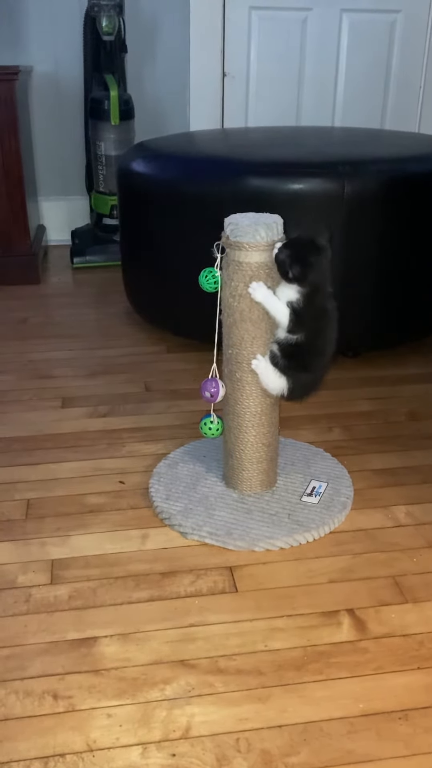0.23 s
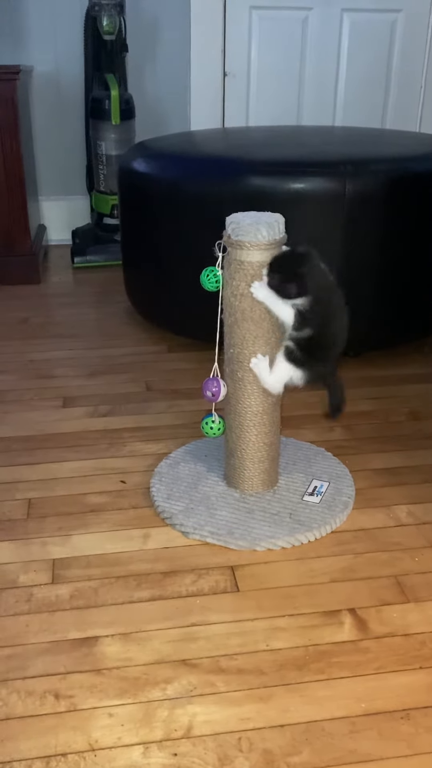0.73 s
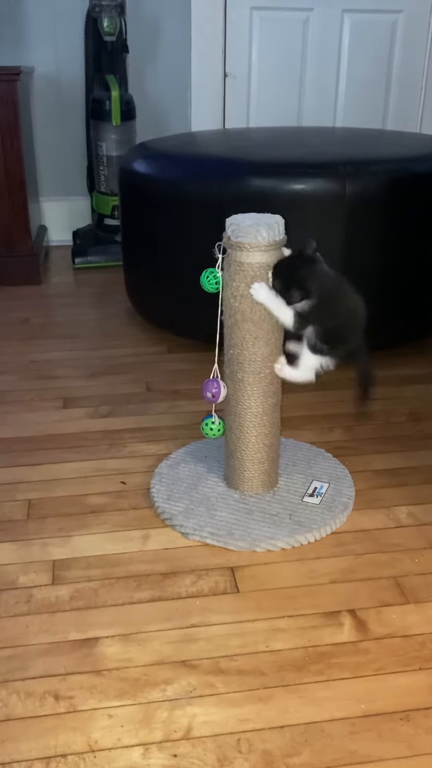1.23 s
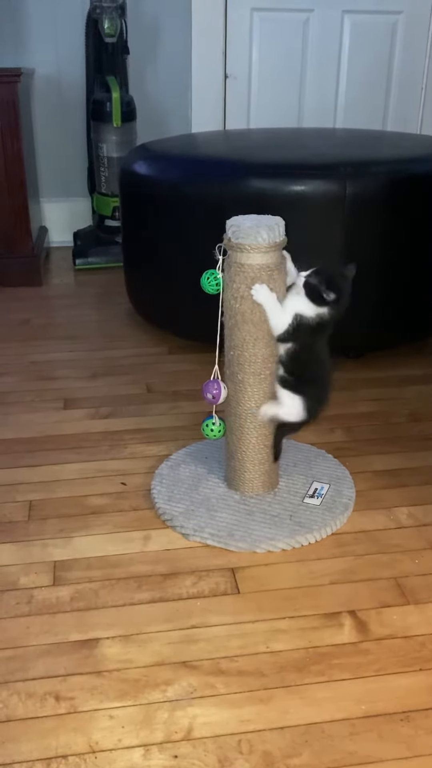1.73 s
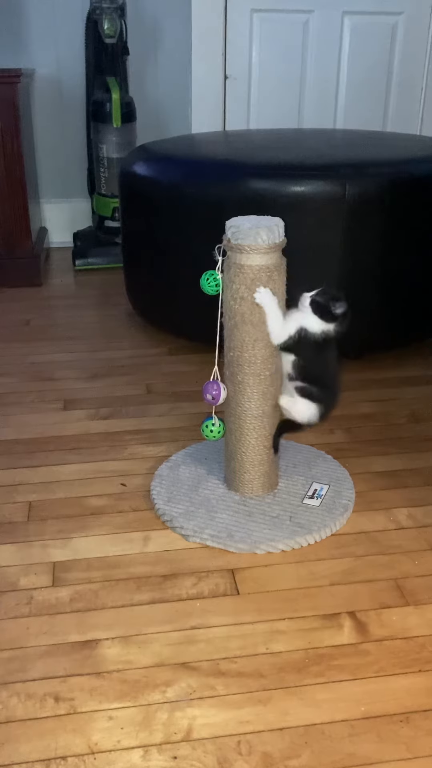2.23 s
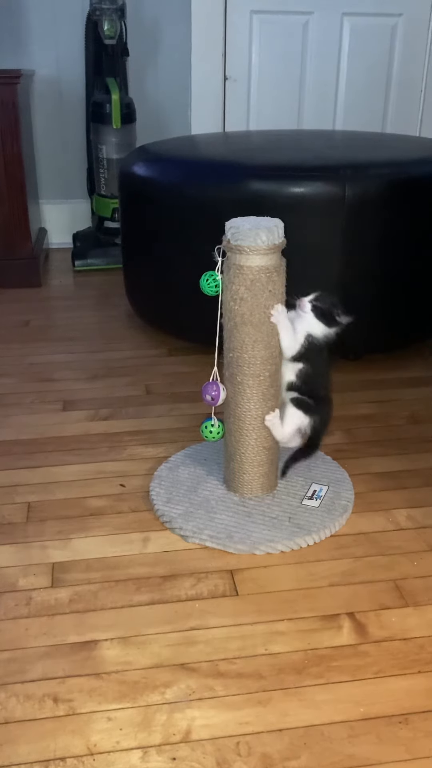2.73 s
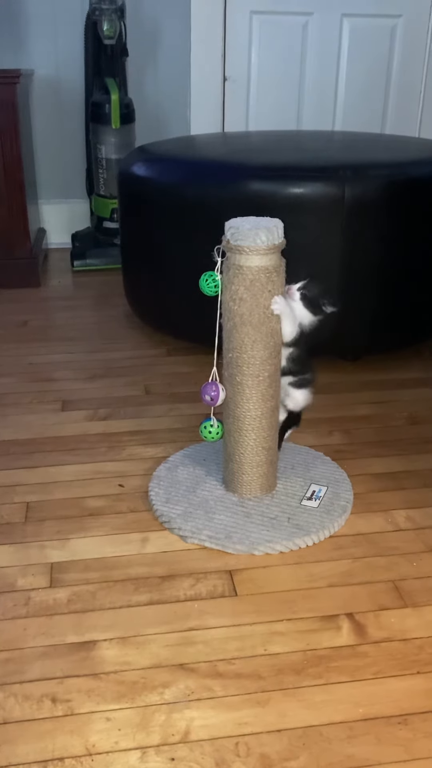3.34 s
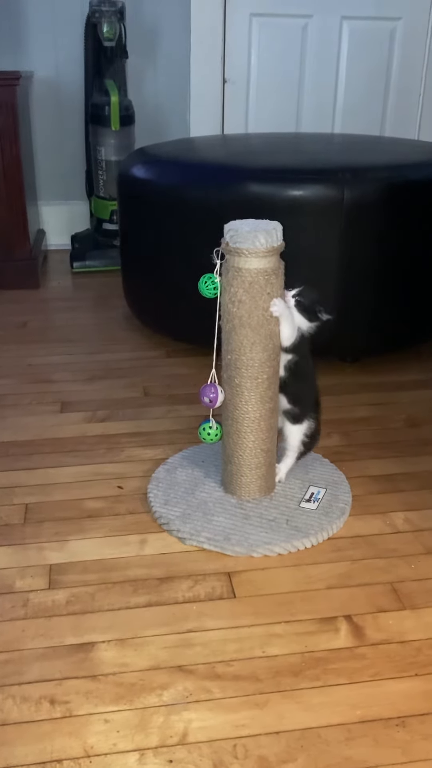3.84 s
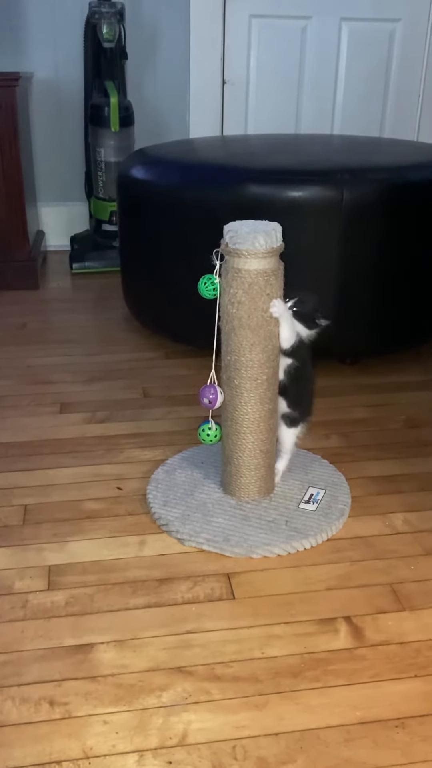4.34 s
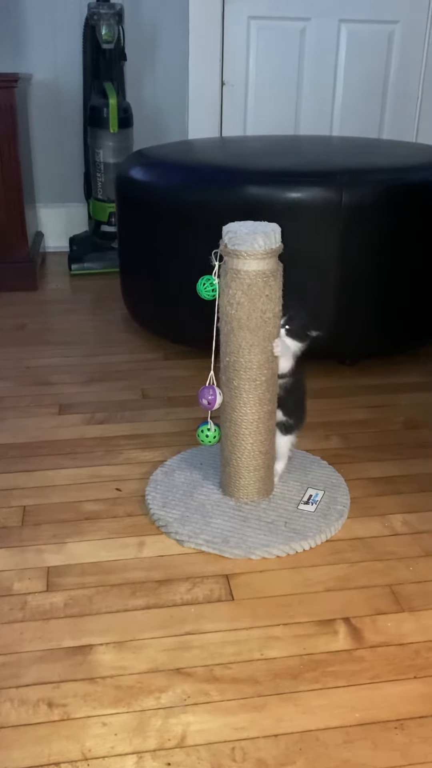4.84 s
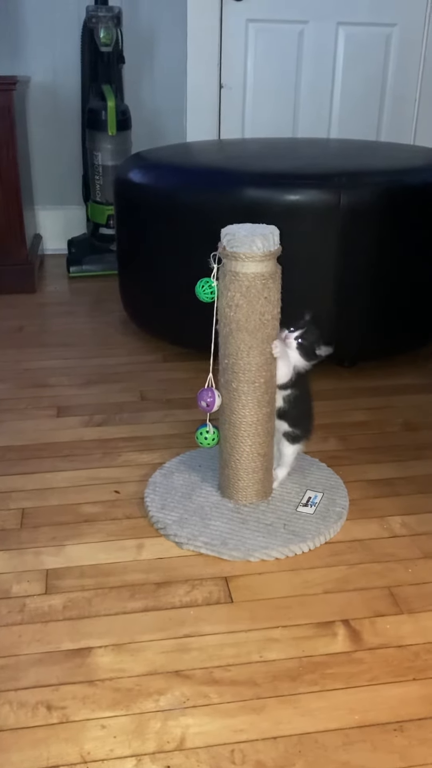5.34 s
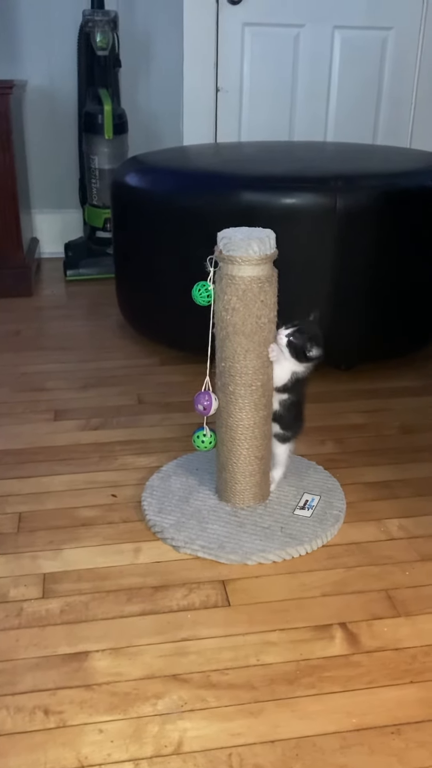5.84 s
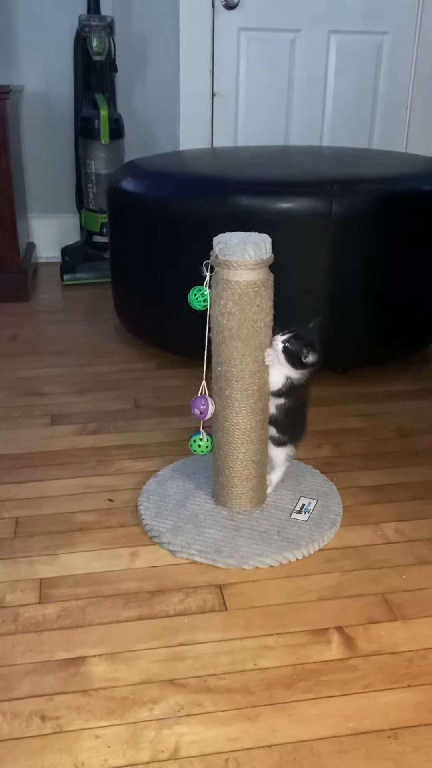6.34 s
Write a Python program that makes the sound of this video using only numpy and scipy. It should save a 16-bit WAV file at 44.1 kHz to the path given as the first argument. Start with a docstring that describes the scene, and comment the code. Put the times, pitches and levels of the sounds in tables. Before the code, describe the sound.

A kitten climbs down a rope-wrapped scratching post in a small living room. After half a second of hum, its claws pluck and snap in uneven clusters, with tiny twangs, rasps and squeaks, busiest from about two to three and a half seconds, then sparser. The hollow post knocks faintly. Low ventilation rumble and a soft fan tone continue throughout, picked up in stereo by a phone.

```python
"""In a living room with a wooden floor, a kitten clambers down a rope-wrapped scratching post.
Its claws drag over the fibres as showers of ticks, squeak as sagging tones, catch, and let go with
a filtered snap, a short twang of the rope and a noisy rasp; a few milliseconds of noise swell up to
each snap. Paws scuff softly; jolts ring the post. The room answers with a floor bounce and a short
noise tail. Ventilation drones under a fan tone and a faint hiss. A phone's two ports hear it."""
import sys
import numpy as np
from scipy import signal
from scipy.fft import rfft, irfft
from scipy.io import wavfile

SR = 44100
rng = np.random.default_rng(int(sys.argv[2]) if len(sys.argv) > 2 else 0)


def store_wav(level_fs):
    """Save 16-bit WAV to argv[1]."""
    pcm = np.round(np.clip(np.atleast_2d(level_fs), -1, 1) * 32767)
    wavfile.write(sys.argv[1], SR, pcm.T.astype(np.int16))


N = 290178
TIME = np.arange(N) / SR
FREQ = np.fft.rfftfreq(2 * N, 1 / SR)

# relative colour of claws dragging over fibres, and of the swells: f/Hz, level/dB
DRAG_COLOUR = [(300, -18.5), (870, -4.5), (1150, -5), (1700, 2.5), (2800, 11), (4000, -1), (5500, 1.5),
               (7500, -1), (10000, -2.5), (14500, -6.5), (16000, -9.5)]
# strokes: a claw slides over the rope, hooks it and lets go; levels are ahead of each layer's trim
# [lets go at t/s, fibre snap level/dB, rasp level/dB, rasp centre f/Hz, rope twang level/dB, twang f/Hz,
#  slide before it t/s, slide level/dB]
CLAW_STROKES = [(0.5448, -60.5, -66, 2900, -67, 2840, .002, -76),
                (0.7846, -60, -63, 2720, -66, 2720, 0.013, -75),
                (.795, -49.5, -53, 3120, -53, 2680, 0.0046, -62.5),
                (0.7981, -56, -54, 3080, -58, 2800, .002, -72),
                (0.9783, -56, -62, 1800, -56.5, 2155, .002, -87),
                (1.1143, -61, -65, 3500, -68, 2880, 0.0022, -81),
                (1.183, -60, -68, 3200, -75, 2900, 0.0036, -74),
                (1.192, -55, -60, 2800, -68, 2880, .004, -68),
                (1.2015, -46, -62, 3300, -75, 2970, .011, -53.5),
                (1.213, -53.5, -54, 3500, -53.5, 2920, 0.011, -67),
                (1.2775, -56.5, -57, 3220, -62, 2350, .004, -80),
                (1.324, -70.5, -72, 3000, -76, 2400, .002, -84),
                (1.332, -63, -61, 2700, -53.5, 2110, 0.003, -78),
                (1.357, -52.5, -51, 3190, -59, 2430, 0.0072, -61),
                (1.624, -68, -68, 2800, -67, 2570, 0.0066, -74),
                (1.648, -60.5, -63, 2970, -73, 2830, 0.023, -72),
                (1.665, -72, -67, 3000, -69.5, 2800, 0.0031, -76),
                (1.9204, -55, -56, 2300, -55.5, 3070, 0.0089, -61),
                (1.944, -48.5, -50, 2680, -51, 2560, 0.019, -60.5),
                (1.964, -56, -60, 2400, -60, 2400, .008, -62),
                (2.03, -63.5, -76, 3200, -80, 2900, 0.013, -66),
                (2.063, -74, -64, 3000, -69, 2400, 0.0036, -76),
                (2.083, -56.5, -47, 2880, -44, 2290, 0.011, -61),
                (2.1469, -42, -54, 3300, -55, 2867, 0.0067, -55),
                (2.151, -52, -50.5, 1700, -60, 1360, 0.0019, -58),
                (2.213, -55, -56, 3500, -57.5, 3280, 0.012, -67),
                (2.269, -58, -46, 3400, -51, 2300, 0.013, -67),
                (2.342, -61, -61, 3101, -74, 2304, 0.013, -74),
                (2.3538, -60.5, -56.5, 2900, -65, 2330, .003, -64),
                (2.3803, -57, -52.5, 2900, -53.5, 2310, 0.001, -70),
                (2.87, -69, -59.5, 3020, -75, 2000, 0.0017, -86),
                (2.896, -61.5, -59, 2000, -74, 1500, 0.0023, -71),
                (2.945, -83, -57, 3700, -72, 1580, 0.0037, -75),
                (3.0079, -48, -40.5, 2750, -47.5, 1690, 0.0041, -55),
                (3.011, -51.5, -40.5, 3430, -48.5, 2310, 0.0018, -60),
                (3.121, -64, -61, 1700, -68, 1400, .004, -60),
                (3.1564, -68, -72, 2000, -73, 1490, 0.026, -69),
                (3.213, -66, -60, 2980, -65, 2801, 0.027, -71),
                (3.2986, -60.5, -73, 2790, -85, 2400, 0.0029, -64),
                (3.4655, -59, -49.5, 2940, -56.5, 1730, 0.0019, -58),
                (3.4738, -59, -50, 3600, -55, 2000, 0.0013, -65),
                (3.485, -58.5, -51, 2310, -54.5, 1480, 0.0058, -53),
                (3.8535, -48.5, -52, 1780, -51.5, 2590, 0.0036, -57),
                (3.8606, -57, -51, 2200, -54, 2700, .002, -62),
                (3.871, -56, -66, 2600, -72, 2400, 0.0059, -68),
                (3.937, -76.5, -57.5, 4096, -72, 2000, 0.006, -80),
                (3.95, -72, -59.5, 3700, -71.5, 1990, 0.0033, -65),
                (4.1, -78.5, -65, 2400, -90, 1914, 0.0025, -78),
                (4.245, -84.5, -75.5, 2900, -66, 2900, 0.0071, -75),
                (4.477, -60.5, -52, 2580, -55, 2660, 0.021, -70.5),
                (4.575, -62, -69, 3000, -78, 2400, .003, -75),
                (4.5944, -60, -50.5, 2980, -48.5, 1877, 0.011, -63),
                (4.64, -62, -53, 3200, -54, 1790, 0.002, -58),
                (4.648, -64.5, -55.5, 2980, -62, 1855, 0.0019, -67),
                (4.8743, -84, -67, 2170, -74, 1600, 0.003, -80),
                (5.0151, -46.5, -47, 2680, -48.5, 2990, 0.0015, -65.5)]
STRAND_S = 0.002  # time from one strand of rope to the next under a sliding claw


def undb(db):
    """Decibels to gain."""
    return 10 ** (np.asarray(db) / 20)


def unit(x):
    """Scale to rms 1."""
    return x / np.sqrt(np.mean(x ** 2))


def curve(points, hz=FREQ):
    """Join (Hz, value) points on a log-frequency axis."""
    f, value = np.transpose(points)
    return np.interp(np.log(np.maximum(hz, 1)), np.log(f), value)


def shape(x, gain):
    """Filter by a gain for each frequency."""
    return irfft(rfft(x, 2 * N) * gain)[..., :N]


def causal(points):
    """Minimum-phase response of unit power with the given colour, so that nothing sounds early."""
    cepstrum = irfft(np.log(unit(undb(curve(points)))))
    # fold the backward half onto the forward half
    cepstrum[1:N] *= 2
    cepstrum[N + 1:] = 0
    return np.exp(rfft(cepstrum))


def around(x, hz, ratio):
    """Keep the band from hz / ratio to hz * ratio."""
    band = signal.butter(2, [hz / ratio, hz * ratio], "band", fs=SR, output="sos")
    return signal.sosfilt(band, x)


def add(track, start_s, sound):
    """Mix a sound into a track."""
    i = int(start_s * SR)
    track[i:i + len(sound)] += sound[:N - i]


def flutter(n, step_s):
    """n samples gliding between normal random values of spread 1, a new one every step."""
    values = rng.standard_normal(256)
    return np.interp(TIME[:n], np.arange(len(values)) * step_s, values)


def spread(common, other):
    """Two channels of a diffuse sound: partly alike, partly opposed."""
    # opposed part against the common part: f/Hz, level/dB
    opposed = [(50, -23.5), (120, -27), (300, -14.5), (600, 6.5), (1200, 12), (2500, -4), (4500, -0.5),
               (7000, -20.5), (15000, -20.5)]
    share = undb(curve(opposed))
    side = shape(other, share / np.sqrt(1 + share ** 2))
    middle = shape(common, 1 / np.sqrt(1 + share ** 2))
    return middle + np.array([side, -side])


def ventilation(fan_hz=184.6, fan_db=-49.5, waver_hz=1.636, rumble_db=-38, hiss_db=-82.5):
    """Air rumble ringing in the room's modes, a slightly wavering fan tone, and a faint hiss."""
    # relative colour of the steady air rumble: f/Hz, level/dB
    air_colour = [(15, -33.5), (27, -20), (40, -7.5), (75, -4), (140, 3.5), (200, -7), (295, -4.5),
                  (340, -22), (450, -25.5), (700, -32), (900, -42), (1250, -52.5), (4000, -80)]
    # relative colour of the hiss: f/Hz, level/dB
    hiss_colour = [(300, -7.5), (1200, -0.5), (2150, 1.5), (2700, -5), (4300, -3.5), (6000, -7), (7300, -8),
                   (7700, -4), (8700, -6), (10500, -6.5), (14200, -10.5), (15300, -23)]
    # room modes that the air noise rings: f/Hz, width at half the lift/Hz, lift/dB
    room_modes = [(44.3, 3.9, 8), (56.4, 14, 5), (88.9, 9.7, 10.5), (115.15, 14.04, 15.5),
                  (134.96, 13.3, 12), (162.2, 12, 9), (187.64, 6.6, 13), (224.9, 20.4, 12.5),
                  (266.4, 22, 6), (362.3, 16, 5), (369, 12, 10.5), (401, 26, 9.5), (485, 31, 9),
                  (571.7, 20, 13.5), (636.4, 48, 14.5)]
    lift = sum(db * np.exp(-np.log(2) * (2 * (FREQ - hz) / width) ** 2) for hz, width, db in room_modes)
    rumble = unit(shape(rng.standard_normal((2, N)), undb(curve(air_colour) + lift)))
    hiss = unit(shape(rng.standard_normal((2, N)), undb(curve(hiss_colour))))
    air = undb(rumble_db) * rumble + undb(hiss_db) * hiss
    waver = unit(shape(rng.standard_normal(N), np.exp(-FREQ / 4)))  # slow noise, a few Hz wide
    fan = unit(np.sin(2 * np.pi * np.cumsum(fan_hz + waver_hz * waver) / SR))
    return spread(*air) + undb(fan_db) * fan


def releases(count=4, turn_s=0.013, turn_jitter=0.25, snag_db=5, snag_twang_db=-18.5,
             snag_scatter_db=-4, snag_detune=0.05):
    """Each stroke's own release, and a small snag at each uneven turn of rope that the slide crosses.

    Rows: (lets go at s, snap dB, rasp dB, rasp Hz, twang dB, twang Hz); at most `count` snags a stroke."""
    rows = []
    chances = rng.standard_normal((len(CLAW_STROKES), count, 4))
    for stroke, chance in zip(CLAW_STROKES, chances):
        s, fibre_db, rub_db, rub_hz, rope_db, hz, lead_s, slide_db = stroke
        rows.append((s, fibre_db, rub_db, rub_hz, rope_db, hz))
        for turn, (late, snap, rasp, detune) in enumerate(chance, 1):
            if turn * turn_s < lead_s:
                snag_s = s - turn_s * (turn + turn_jitter * late)
                db = slide_db + snag_db
                pitch = 1 + snag_detune * detune
                rows.append((snag_s, db + snag_scatter_db * snap, db + snag_scatter_db * rasp,
                             rub_hz * pitch, db + snag_twang_db, hz * pitch))
    return rows


def swells(let_go, lead_s=0.0044, swell_db=-14, scatter_db=4):
    """A few milliseconds of noise swell up to each snap."""
    out, t = np.zeros(N), TIME[:1024]
    chances = rng.standard_normal((len(let_go), 2, len(t)))
    for (s, fibre_db, rub_db, *_), (sign, size) in zip(let_go, chances):
        # a decay played backwards swells up to the snap
        noise = unit(sign * undb(scatter_db * size) * np.exp(-t / lead_s))[::-1]
        strength = np.sqrt(undb(fibre_db) * undb(rub_db))
        add(out, s - t[-1], undb(swell_db) * strength * noise)
    return shape(out, causal(DRAG_COLOUR))


def drags(fibres_per_s=700, scatter_db=5, drag_db=-11.5, follow_s=0.0067, ease=0.33, slant=0.67,
          strand_db=5, creak_pitch=0.8, creak_db=-14.5, creak_width_hz=600):
    """A sliding claw ticks over many fine fibres of uneven strength; the ticks keep the rope creaking."""
    scratch, creak = np.zeros((2, N))
    for s, _, _, _, rope_db, twang_hz, lead_s, slide_db in CLAW_STROKES:
        start = s - lead_s
        n = int((lead_s + follow_s) * SR)  # the claw slides on briefly after letting go
        slip, sign, size = rng.random((3, SR // 2))[:, :n]
        strength = undb(scatter_db * np.minimum(-np.log(size), 3))
        ticks = (slip < fibres_per_s / SR) * np.sign(sign - 0.5) * strength + 1e-12  # never all zero
        hz = creak_pitch * twang_hz  # the held rope creaks lower than it twangs
        rope = signal.lfilter(*signal.iirpeak(hz, hz / creak_width_hz, fs=SR), ticks)
        # the pull builds up as the claw digs in, then ends quickly
        pull = signal.windows.tukey(n, ease) * np.linspace(slant, 1, n)
        # it bites and skips from strand to strand
        pressure = pull * undb(strand_db * flutter(n, STRAND_S))
        add(scratch, start, undb(slide_db + drag_db) * unit(ticks * pressure))
        add(creak, start, undb((slide_db + rope_db) / 2 + creak_db) * unit(rope * pressure))
    return shape(scratch, causal(DRAG_COLOUR)) + creak


def catches(let_go, snap_db=1, snap_s=0.0017, splinter_db=-14, release_s=0.0007,
            twang_s=0.0011, split=0.056, taut_db=9, slack_ring_s=0.0014,
            rasp_s=0.0018, grit_db=6, rasp_spread=1.52):
    """A fibre snaps off the claw; the plucked rope rings for a few cycles and rasps on its neighbours."""
    # relative colour of the snaps: f/Hz, level/dB
    snap_colour = [(300, -40.5), (850, 0), (1250, -10), (2600, -9.5), (4000, -4.5), (5600, 0), (6400, -1),
                   (7000, 2), (7500, -0.5), (8200, 0.5), (11000, -4.5), (14500, -10.5), (16000, -11.5)]
    # relative colour of the rasps: f/Hz, level/dB
    rasp_colour = [(600, -3), (880, 1.5), (1150, -0.5), (1550, -3.5), (2100, -4), (3100, -3.5), (4200, 1),
                   (5500, 2), (8000, 3)]
    snaps, twangs, rasps = np.zeros((3, N))
    t = TIME[:1024]
    span = np.sqrt(150 / len(t))  # levels count as rms over 150 samples
    release = 1 - np.exp(-(t / release_s) ** 2)
    chances = rng.standard_normal((len(let_go), 3, len(t)))
    for (s, fibre_db, rub_db, rub_hz, rope_db, hz), chance in zip(let_go, chances):
        # one clean break, then finer splinters
        crack = (t == 0) + undb(splinter_db) * chance[0] * np.exp(-t / snap_s)
        add(snaps, s, span * undb(fibre_db + snap_db) * unit(crack))
        # the rope twangs in two close tones, and for longer when the snap is weak beside the twang
        slack = 1 / (1 + undb(fibre_db + taut_db - rope_db) ** 2)
        decay_s = twang_s + slack * slack_ring_s
        ring = sum(np.sin(2 * np.pi * (hz * (1 + k * split) * t + phase))
                   for k, phase in zip((-1, 1), chance[:, -1]))
        add(twangs, s, span * undb(rope_db) * unit(ring * release * np.exp(-t / decay_s)))
        # the rasp is a gritty noise of uneven grains around its own centre
        grit = chance[1] * undb(grit_db * chance[2]) * release * np.exp(-t / rasp_s)
        add(rasps, s, span * undb(rub_db) * unit(around(grit, rub_hz, rasp_spread)))
    return shape(snaps, causal(snap_colour)) + twangs + shape(rasps, causal(rasp_colour))


def resonance(hz, width):
    """Response of one mode, gain 1 at its centre."""
    return 1j * FREQ * width / (hz ** 2 - FREQ ** 2 + 1j * FREQ * width)


def post_tube(push):
    """The hollow post rings in its modes when it is pushed."""
    # modes of the post's tube: f/Hz, width/Hz, level/dB
    tube_modes = [(877, 37, -2.5), (1410, 20, -1), (1570, 97, -1.5), (2000, 91, -12), (2430, 74, -8.5),
                  (2790, 210, -4.5)]
    return shape(push, sum(undb(db) * resonance(hz, width) for hz, width, db in tube_modes))


def grips(first_s=0.9, last_s=3.7, per_s=8, snap_db=-83, rope_db=-83.5, centre_hz=2400,
          scatter_db=-5.5, scatter_octaves=0.14):
    """Claws shift their grip and pick faintly at the rope at random moments; rows as in releases()."""
    chance = rng.standard_normal((128, 2))
    times = first_s + np.cumsum(rng.exponential(1 / per_s, len(chance)))
    strengths = scatter_db * chance[:, 0]
    pitches = centre_hz * 2 ** (scatter_octaves * chance[:, 1])
    return [(s, snap_db + db, rope_db + db, hz, rope_db + db, hz)
            for s, db, hz in zip(times, strengths, pitches) if s < last_s]


def squeaks(sag_per_s=3, wobble=0.069, rough_db=5, ease=0.25):
    """Stick and slip keep a taut strand singing: a short rough tone that sinks as the strand gives."""
    # a claw drawn tightly along a strand: start t/s, length t/s, level ahead of the claw trim/dB,
    # starting pitch f/Hz, ahead of the wobble
    taut_strands = [(0.977, 0.0074, -62, 2150), (1.6197, 0.015, -62, 2133), (1.638, 0.014, -65, 2080),
                    (1.658, .016, -69.5, 2040), (2.111, 0.03, -68.5, 1986), (2.376, .013, -67, 2040),
                    (3.934, 0.026, -70.5, 2072), (4.639, 0.015, -64, 1976), (4.873, 0.0054, -67.5, 2040)]
    out = np.zeros(N)
    for s, length_s, db, hz in taut_strands:
        n = int(length_s * SR)
        pitch = hz * (1 - sag_per_s * TIME[:n] + wobble * flutter(n, STRAND_S))
        # stick and slip shake the level
        grip = signal.windows.tukey(n, ease) * undb(rough_db * flutter(n, STRAND_S))
        tone = np.sin(2 * np.pi * np.cumsum(pitch) / SR)
        add(out, s, undb(db) * unit(grip * tone))
    return out


def jolts(push_s=0.00036, jolt_db=27):
    """Short soft pushes on the tube as a claw takes up the kitten's weight."""
    # the weight jolts the post: t/s, level ahead of jolt_db/dB
    weight_jolts = [(0.982, -50.5), (1.355, -48), (1.922, -54), (1.945, -43.5), (2.086, -48), (2.355, -49),
                    (3.47, -60), (3.855, -40.5), (4.477, -47.5), (5.016, -46)]
    out, t = np.zeros(N), TIME[:256]
    for s, db in weight_jolts:
        add(out, s, undb(db + jolt_db) * t / push_s * np.exp(-t / push_s))
    return out


def scuffs(band_ratio=1.36, grain_db=1.5, rise_s=0.0015):
    """A paw's pad brushes the rope: a soft grainy rub that dies as the paw comes to rest."""
    # rubs that do not catch: start t/s, length t/s, level ahead of the claw trim/dB, centre f/Hz
    paw_rubs = [(1.139, 0.096, -78.5, 2950), (2.411, 0.12, -78.5, 2400), (3.134, 0.031, -86, 1390),
                (3.493, 0.096, -75.5, 2400), (4.367, 0.025, -80.5, 2100), (5.139, 0.015, -72, 2320),
                (5.181, 0.013, -78, 2720), (5.456, 0.007, -74.5, 2960), (6.287, 0.021, -72.5, 1450)]
    out = np.zeros(N)
    for s, length_s, db, hz in paw_rubs:
        t = TIME[:int(length_s * SR)]
        sign, size = rng.standard_normal((2, SR // 2))[:, :len(t)]
        speed = (1 - np.exp(-t / rise_s)) * np.sqrt(1 - t / length_s)
        grains = sign * undb(grain_db * size) * speed
        add(out, s, undb(db) * unit(around(grains, hz, band_ratio)))
    return out


def room(x, floor_s=0.0022, floor_db=-8, wet_db=-1.5, build_s=0.0016):
    """Direct sound, a bounce off the wooden floor, then a short noise tail fading band by band."""
    # the tail's level by band, ahead of wet_db: f/Hz, level/dB
    echo_level = [(300, 16.5), (900, 7.5), (2000, 2.8), (4500, -2.4), (8000, -4.5), (15000, -6.5)]
    # the tail's time to fall by 60 dB: f/Hz, t60/s
    echo_t60 = [(500, 0.12), (2000, 0.2), (4000, 0.24), (8000, 0.195), (15000, 0.115)]
    t = TIME[:SR // 2]
    tail = 0
    edges = np.geomspace(300, 16000, 9)
    for lo, hi in zip(edges, edges[1:]):
        hz = np.sqrt(lo * hi)
        band_filter = signal.butter(2, [lo, hi], "band", fs=SR, output="sos")
        band = signal.sosfilt(band_filter, rng.standard_normal((2, len(t))))
        fade = np.exp(-np.log(1000) * t / curve(echo_t60, hz)) * (1 - np.exp(-(t / build_s) ** 2))
        fade = fade / np.sqrt(np.sum(fade ** 2))
        tail = tail + band * fade * undb(curve(echo_level, hz) + wet_db)
    direct = shape(x, 1 + undb(floor_db) * np.exp(-2j * np.pi * FREQ * floor_s))
    return direct + spread(*signal.fftconvolve(x[None], tail, axes=1)[:, :N])


def scene(coupling_db=-3, claws_db=-1):
    """Claws work on the rope, the post's tube rings along, and the room hums."""
    let_go = releases() + grips()
    claws = drags() + swells(let_go) + catches(let_go) + squeaks() + scuffs()
    claws = undb(claws_db) * claws
    post = post_tube(undb(coupling_db) * claws + jolts())
    return room(claws + post) + ventilation()


def record(dry, top_hz=15800):
    """The phone's right port is shifted in phase against the left and has less bass; the top is cut."""
    # lag of the right port behind the left: f/Hz, phase/rad
    port_lag = [(400, 0), (700, -1.4), (1300, -1.1), (1800, .2), (2600, 2.6), (3600, 1.8), (4400, 2.7),
                (5500, 3.3), (6700, 4.4), (8400, 6.2), (9500, 6.9), (12000, 9.4), (15500, 12.6)]
    # right port against the left: f/Hz, level/dB
    port_level = [(50, -9), (150, -5), (300, -5), (600, -2), (1000, 0), (2000, 0), (4000, -0.5)]
    right = shape(dry[1], undb(curve(port_level)) * np.exp(-1j * curve(port_lag)))
    top_cut = signal.ellip(10, 0.2, 80, top_hz, fs=SR, output="sos")
    return signal.sosfilt(top_cut, np.array([dry[0], right]))


dry = scene()
out = record(dry)
store_wav(out)
```